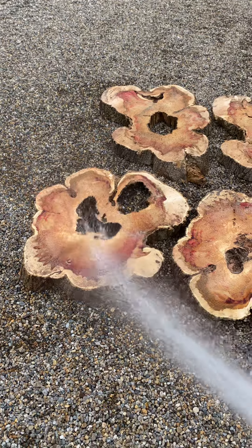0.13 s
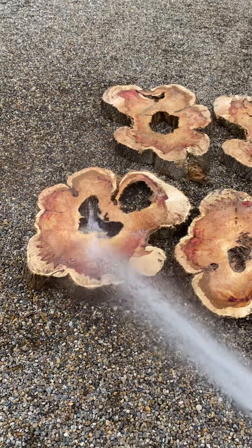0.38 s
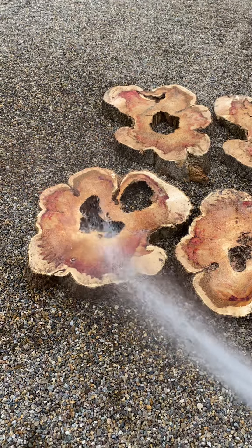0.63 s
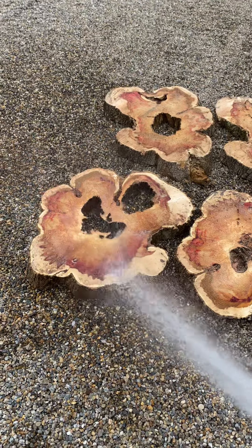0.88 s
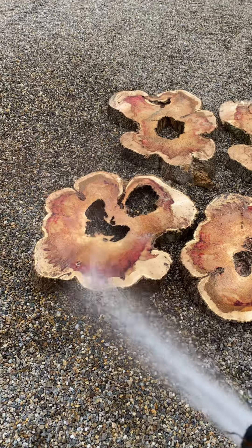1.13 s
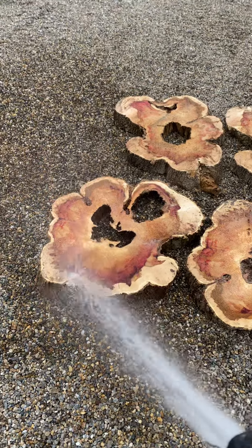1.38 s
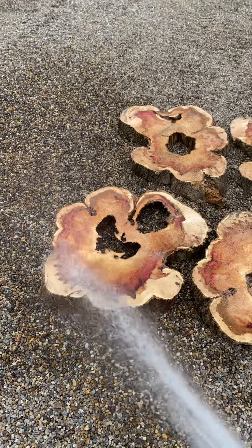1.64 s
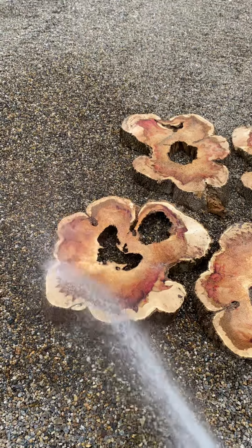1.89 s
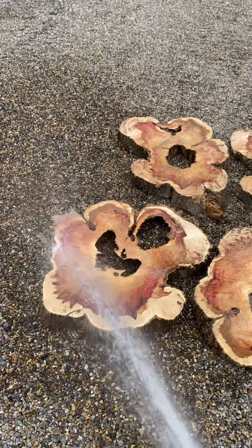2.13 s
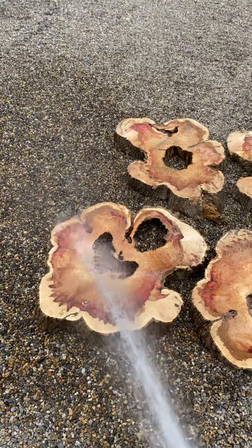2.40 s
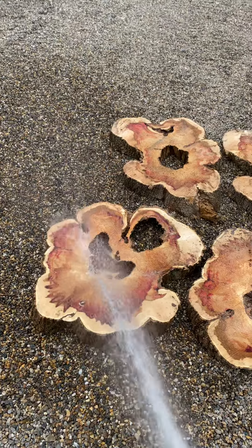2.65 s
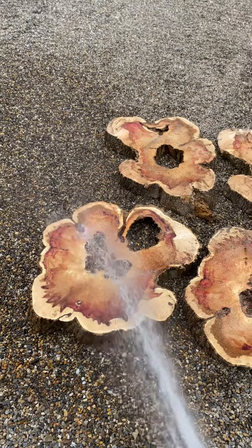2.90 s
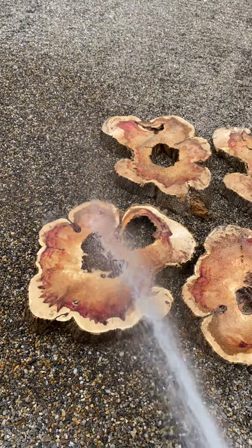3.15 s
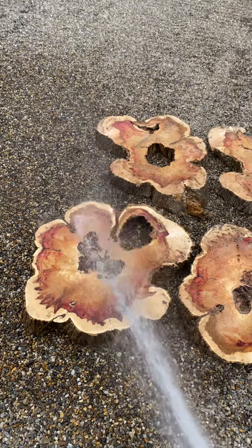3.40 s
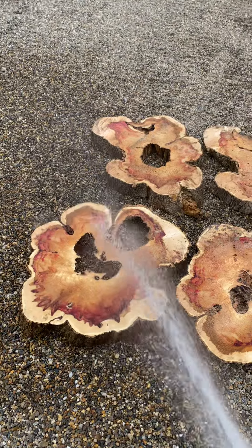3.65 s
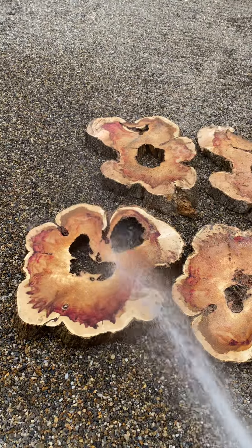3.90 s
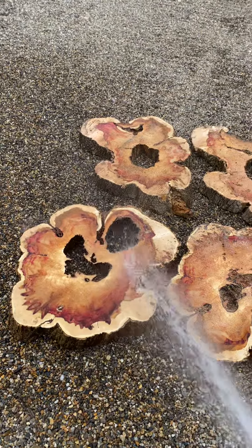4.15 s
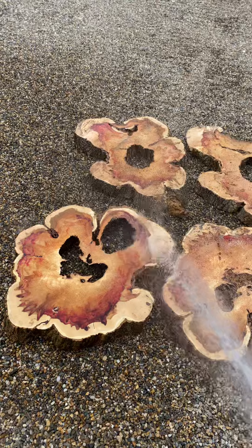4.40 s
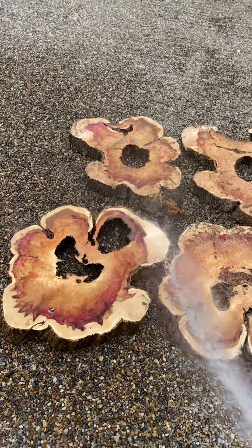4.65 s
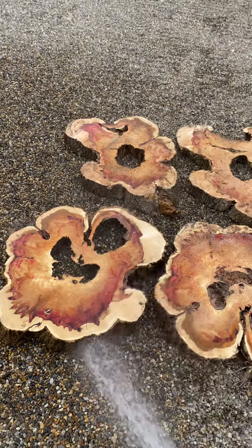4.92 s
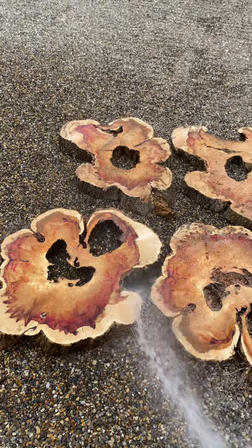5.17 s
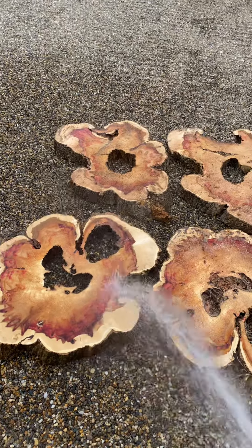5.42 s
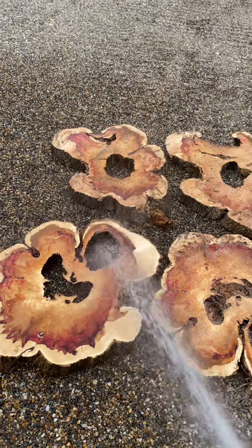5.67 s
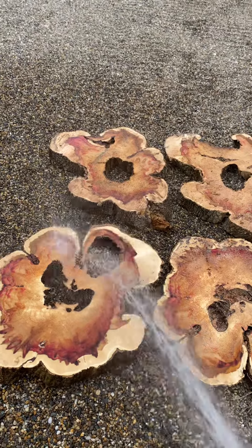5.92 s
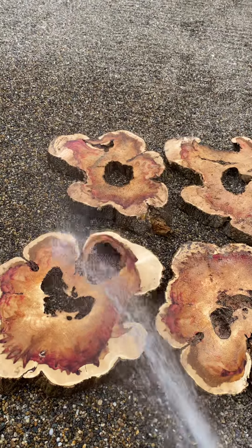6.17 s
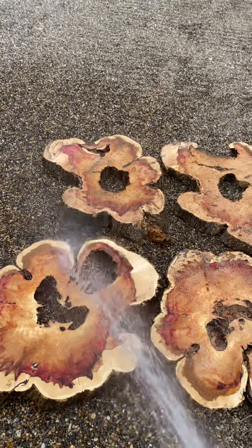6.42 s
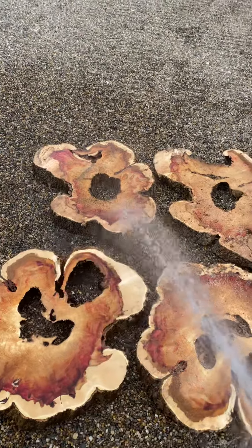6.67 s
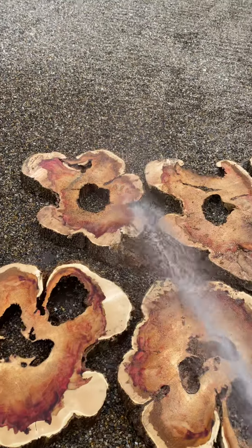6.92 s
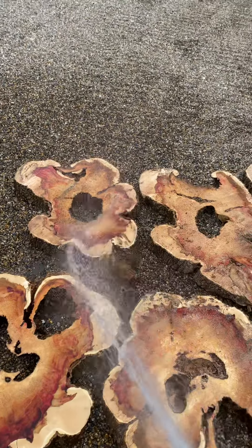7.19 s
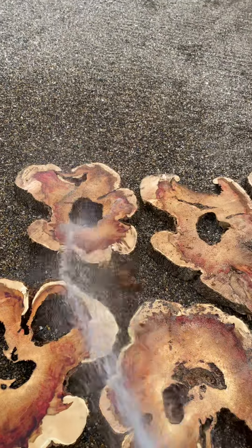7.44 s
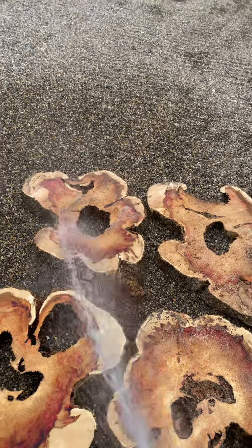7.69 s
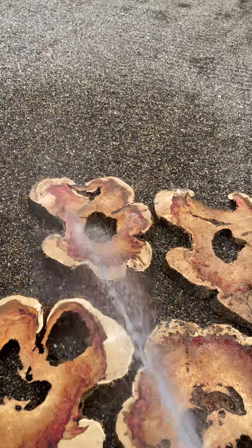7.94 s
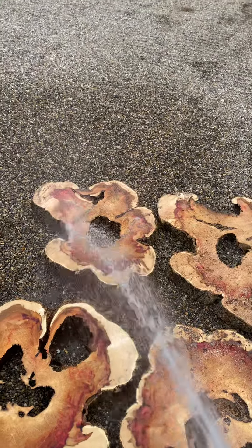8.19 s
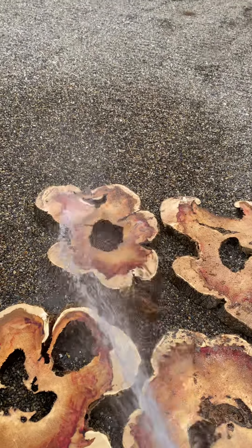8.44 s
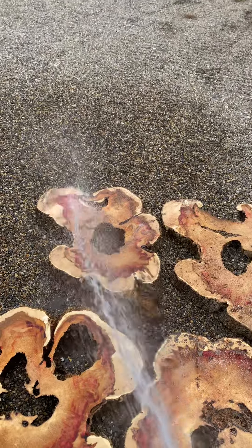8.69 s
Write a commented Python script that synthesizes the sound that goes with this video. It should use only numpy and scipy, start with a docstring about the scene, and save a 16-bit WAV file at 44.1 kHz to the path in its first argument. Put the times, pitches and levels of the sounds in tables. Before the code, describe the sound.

A pressure washer jet sprays wet wooden slabs outdoors for nearly nine seconds, heard close in wide, dry stereo. A bright, grainy, airy hiss with dense spatter runs throughout over faint run-off and a low, unsteady pump hum. It begins at 0 s with an abrupt splash and hollow knock, then a softer woody rush around 0.4-0.6 s and a brief low swell near 0.6. From 1 to 1.9 s it is mostly plain hiss. Between 2 and 3.2 s the jet drums rims and holes in overlapping throaty roars, with more short ones until 3.9. From 4 to 4.9 s it thins to smooth hiss. Quick splashy surges come near 5, 5.3, 5.7 and 6 s, and fuller spatter around 6.4, with a sharp drop tick. Short bursts follow near 7, 7.2, 8.3 and 8.5 s as the hiss becomes slightly lighter, continuing to the end.

```python
"""Outdoors, on pebbled concrete, a pressure washer's fan jet sweeps over wet wooden slabs.
The jet hisses and splashes as patchy noise with random drop impacts, over a steady run-off.
Striking a rim or a hole squarely, it drives the slab's resonances into a roar.
Stray drops tick as bursts of a few cycles and the far pump hums over low rumble.
Two close microphone ports hear it all, each with its own lag and level."""
import sys
import numpy as np
from scipy import signal
from scipy.fft import rfft, irfft, next_fast_len
from scipy.io import wavfile
from scipy.ndimage import uniform_filter1d, map_coordinates

SR = 44100
rng = np.random.default_rng(int(sys.argv[2]) if len(sys.argv) > 2 else 0)


def wav_record(signal):
    """Record a signal, one row per channel, as 16-bit PCM in the file named by sys.argv[1]."""
    frames = np.transpose(np.atleast_2d(signal))
    bounded = np.clip(frames, -1, 1)
    # unit amplitude maps onto the largest positive 16-bit level
    quanta = np.round(bounded * 32767).astype(np.int16)
    wavfile.write(sys.argv[1], SR, quanta)


def voltage_ratio(level):
    """Linear amplitude factor for a level in decibels (scalar or array-like)."""
    return 10 ** (np.asarray(level, float) / 20)


N = 388962  # samples


def spray():
    """The jet's own hiss, the splash off the surface and the steady run-off, all turbulent water."""
    # steady spray: start_s, splash_db, hiss_db
    steady_levels = [(0, -33.5, -25.5), (.29, -33.5, -27.5), (.73, -33.5, -24.5), (1.03, -38.5, -27),
                     (1.42, -37, -26), (1.62, -38.5, -28), (2.7, -35.5, -27.5), (3.41, -38, -28),
                     (3.71, -34.5, -28), (4.45, -39.5, -28), (5.1, -39.5, -28), (6.16, -37.5, -28),
                     (6.36, -33, -27), (6.93, -41, -28), (7.15, -40, -31), (7.45, -36.5, -28.5),
                     (8.3, -37, -30.5), (8.82, -38, -31)]
    # water thrown back as the jet crosses an edge: start_s, length_s, splash_db, hiss_db
    surges = [(0, 0.0092, -28.5, -42), (4.936, 0.06, -35, -30.5), (5.257, .07, -37.5, -27.5),
              (5.683, 0.16, -32, -32.5), (6.038, 0.078, -33, -38), (6.956, 0.061, -36.5, -47),
              (7.214, .09, -37.5, -28.5), (8.34, 0.028, -37, -33), (8.539, 0.029, -32.5, -27.5)]
    # noise colours before level scaling: pitch_hz, level_db
    hiss_colour = [(2000, -60), (3800, -12), (4800, 0), (5500, -2), (6300, 0), (7200, -2), (10000, -1),
                   (12500, -2.5), (13400, -4.5), (15600, -4)]
    splash_colour = [(900, -37), (1700, -3), (2400, 0.5), (4200, 2), (5200, -7.5), (12000, -61)]
    runoff_colour = [(60, -50), (150, -0.5), (300, -5), (1300, -6), (1900, -8), (5000, -52)]

    start, length, *surge_db = np.transpose(surges)
    levels = []
    for steady, db in zip(curves(steady_levels), surge_db):
        surge_power = passes(start, length, db, swell_db=0, rise=161, fall=189)
        levels.append(np.sqrt(steady ** 2 + surge_power))
    splash, hiss = levels

    def brightness(hz, lead, centre, bright):
        return voltage_ratio(bright * np.log2(np.maximum(hz, 100) / 7000))

    def splash_peak(hz, lead, centre, bright):
        return voltage_ratio(3.3 * np.exp(-((hz - centre) / 400) ** 2))

    jet = water(colour(hiss_colour), patchy_db=1.54, flutter_db=.5, drops=1500, drop_db=-4.0)
    jet = moving(jet, brightness)
    spatter = water(colour(splash_colour), patchy_db=1.5, flutter_db=0.58, drops=640, drop_db=-5.0)
    spatter = unit(moving(spatter, splash_peak))
    runoff = water(colour(runoff_colour), patchy_db=2.0, flutter_db=0.54, drops=400, drop_db=-6)
    return hiss * jet + splash * spatter + voltage_ratio(-43.5) * runoff


def slab():
    """Slugs of water drum the wood and the air in its holes; one small spot sounds, so less is scattered."""
    # the jet meets a rim or a hole squarely: start_s, length_s, hollow_db, rim_db, swell_db over the length
    strikes = [(-.02, 0.068, -34, -28.5, -2.5), (.39, 0.23, -41.5, -40, -3),
               (1.963, 0.054, -35.5, -32.5, -2.5), (2.253, .2, -29, -31, -2.5),
               (2.465, 0.13, -34.5, -35.5, -1), (2.63, 0.2, -29, -29.5, 1.5), (2.895, 0.3, -40, -32, 2),
               (3.291, .24, -44, -38, 4.5), (3.6, .22, -44, -42.5, -1), (3.856, 0.082, -35.5, -30, 4),
               (4.768, 0.014, -43.5, -44, -10), (4.968, .02, -45, -36, -6), (5.44, 0.028, -44, -43, -3),
               (5.744, 0.18, -43, -42.5, 1), (6.008, 0.065, -44, -35.5, -2), (6.955, 0.05, -40.5, -37.5, 2),
               (7.987, 0.11, -51, -39, -2), (8.178, 0.022, -53, -42, 6), (8.29, 0.043, -42.5, -39, -4)]
    # resonances of the struck slab, relative levels: pitch_hz, width_hz of each of two passes, level_db
    hollow_modes = [(290, 250, -2.5), (391, 200, -0.5), (557, 345, 8)]
    rim_modes = [(957, 380, 1.5), (1249, 640, 10.5), (2220, 320, -2)]

    start, length, hollow_db, rim_db, swell_db = np.transpose(strikes)

    def roar_level(graze_db, strike_db, lag_s):
        # between strikes the jet only glances off the wood, at a drifting level
        graze = voltage_ratio(graze_db + 2.5 * wobble(3.13))
        struck_power = passes(start + lag_s, length, strike_db, swell_db, rise=350, fall=231)
        return np.sqrt(graze ** 2 + struck_power)

    # the air in the hole speaks a moment after the rim
    hollow = roar_level(-51, hollow_db, lag_s=0.023)
    rim = roar_level(-50.5, rim_db, lag_s=0)
    out = hollow * water(resonant(hollow_modes), patchy_db=2.0, flutter_db=0.85, drops=540, drop_db=-8.5)
    out += rim * water(resonant(rim_modes), patchy_db=1.5, flutter_db=1.85, drops=500, drop_db=-11)
    return out * voltage_ratio([[0], [-4]])  # direct, scattered


def ticks():
    """Each hard drop is a direct burst of a few cycles, swelling and then dying exponentially."""
    # single hard drops: start_s, level_db of the envelope's top, pitch_hz
    hard_drops = [(.681, -14, 6390), (1.312, -12, 6050), (1.437, -15, 6620), (4.978, -17, 2600),
                  (6.3932, -8, 6000), (6.568, -14, 5640), (7.196, -15, 5850), (8.239, -15, 6790)]
    out, t = np.zeros((2, N + 400)), np.arange(400) / SR
    for s, db, hz in hard_drops:
        age = hz * t / .9  # the envelope tops at age 1, after about one cycle
        burst = np.sin(2 * np.pi * hz * t) * age * np.exp(1 - age)
        out[0, round(s * SR):][:len(t)] += voltage_ratio(db) * burst
    return out[:, :N]


def pump():
    """An unsteady firing tone, direct only, over low rumble of filtered noise."""
    # shared level, before the rumble's gain and the tone's wobble: start_s, level_db
    pump_levels = [(0.0, -43.5), (0.56, -34.5), (0.61, -41), (3.39, -43.5), (3.46, -39), (3.54, -45),
                   (3.76, -43), (8.82, -42.5)]
    # noise colour before level scaling: pitch_hz, level_db
    rumble_colour = [(20, -50), (35, -11), (45, -10), (56, 0.5), (110, -4.5), (160, -13.5), (400, -29)]
    level, = curves(pump_levels)
    hz = 56 + 1.52 * wobble(4)
    tone = voltage_ratio(1.5 * wobble(6.6)) * np.sin(2 * np.pi * np.cumsum(hz) / SR)
    rumble = voltage_ratio(2.5) * unit(filtered(rng.standard_normal((2, N)), colour(rumble_colour)))
    return level * (rumble + [[1], [0]] * tone)


def water(response, patchy_db, flutter_db, drops, drop_db):
    """Turbulent noise in patches, fluttering, with drops impacts a second of unequal size; direct and scattered."""
    z = signal.stft(rng.standard_normal((2, N)), nperseg=256)[2]
    # patches: a random field smoothed over frequency, then over time
    field = uniform_filter1d(rng.standard_normal(z.shape[1:]), size=5, axis=0)
    field = uniform_filter1d(field, size=16, axis=1)
    noise = signal.istft(z * voltage_ratio(patchy_db * unit(field)), nperseg=256)[1][:, :N]
    impacts = (rng.random((2, N)) < drops / SR) * rng.laplace(size=(2, N))
    stream = unit(noise) + voltage_ratio(drop_db) * unit(impacts)
    stream = stream * voltage_ratio(flutter_db * wobble(45))
    return unit(filtered(stream, response))


def resonant(modes):
    """Causal sum of resonances, passed twice for steep skirts."""
    def ring(f):
        return sum(voltage_ratio(db / 2) * 1j * f * w / (c * c - f * f + 1j * f * w) for c, w, db in modes)
    return lambda f: ring(f) ** 2


def passes(start, length, level_db, swell_db, rise, fall):
    """Summed power of events that rise, hold with a swell, and fall at steady dB per second."""
    t = np.arange(0, N, 32)[:, None] / SR
    through = np.clip((t - start) / np.maximum(length, .005), 0, 1) - .5
    db = level_db + swell_db * through
    db = db - rise * np.maximum(start - t, 0) - fall * np.maximum(t - start - length, 0)
    return np.interp(np.arange(N) / SR, t[:, 0], (voltage_ratio(db) ** 2).sum(1))


def moving(x, response):
    """x times a response of frequency and of the jet's aim as it moves."""
    # where the jet points: start_s, extra_left_lead_rad near 3150 Hz, splash_centre_hz,
    # brightness of the hiss_db_per_octave
    jet_aim = [(0, 0.94, 2450, 1), (.5, 1.1, 2510, 0.5), (.75, 1.5, 2880, 0.5), (1.8, 2.3, 2980, 1),
               (2.05, 0.28, 2350, 0.5), (4.3, -0.81, 2570, 0), (4.85, -1.2, 3260, 3),
               (5.35, -0.46, 3250, 3), (5.6, -0.36, 4300, -2.5), (6.0, 1.2, 4430, -.5),
               (6.45, 1.2, 4250, 0), (6.75, 0.39, 3600, -1), (7.3, 0.13, 4180, 1.5), (8.82, 0.96, 4060, 3)]
    hz, t, z = signal.stft(x, SR, nperseg=512)
    s, *aim = np.transpose(jet_aim)
    gain = response(hz[:, None], *[np.interp(t, s, c) for c in aim])
    return signal.istft(z * gain, SR, nperseg=512)[1][..., :N]


def ports(pair):
    """A direct and a scattered sound reach the two microphone ports with their own lag and level."""
    # microphone ports: pitch_hz, likeness (0-1), left_lead_rad, left_minus_right_db
    port_table = [(100, .975, 0, 0), (430, .93, -.3, 2.6), (860, .7, -.55, -.9), (1300, .8, -.15, -2.2),
                  (1850, .91, .2, .5), (2500, .62, 1.1, .6), (3050, .55, 1.3, -3), (3700, .52, .9, -.7),
                  (4350, .35, 2.1, -1), (4650, .75, 3.1, -.5), (4900, .62, 4.2, -1.5), (5200, .52, 5.6, -3),
                  (5600, .86, 6.5, -.7), (7200, .7, 7.3, 0), (11000, .8, 9, .4), (12000, .9, 9.4, 0)]
    f, alike, lead_rad, tilt_db = np.transpose(port_table)

    def share(hz, swing, *_):
        # the scattered part enters the ports with opposite signs, making them less alike
        turn = np.arccos(np.interp(hz, f, alike)) / 2
        # around the body's shadow frequency the lag follows the direction of the jet
        lead = np.interp(hz, f, lead_rad) + swing * np.exp(-((hz - 3150) / 380) ** 2)
        left = voltage_ratio(np.interp(hz, f, tilt_db) / 2) * np.exp(.5j * lead)
        direct, scattered = np.cos(turn), np.sin(turn)
        return np.array([[left * direct, left * scattered], [direct / left, -scattered / left]])

    return moving(pair, share).sum(1)


def opposed_treble(x):
    """Above a jumpy edge only the difference of the two channels is left."""
    hz, t, z = signal.stft(x.mean(0), SR, nperseg=1024)
    edge_hz = 11350 + 520 * wobble(18)[np.minimum(t * SR, N - 1).astype(int)]
    edge_hz = np.round(edge_hz / 689) * 689  # the edge jumps in steps
    shared_treble = signal.istft(z * (hz[:, None] > edge_hz), SR, nperseg=1024)[1][:N]
    return x - shared_treble


def unit(x):
    """Scale to rms 1."""
    return x / np.sqrt(np.mean(x ** 2) + 1e-20)


def curves(rows):
    """One gain per sample for each dB column."""
    s, *cols = np.transpose(rows)
    return [voltage_ratio(np.interp(np.arange(N) / SR, s, c)) for c in cols]


def wobble(rate):
    """A smooth random curve, rate knots a second."""
    knots = rng.standard_normal(int(N * rate / SR) + 4)
    return map_coordinates(knots, [np.arange(N) * rate / SR])


def filtered(x, response):
    """x times a complex response of frequency."""
    m = next_fast_len(N + 8192)
    return irfft(rfft(x, m) * response(np.fft.rfftfreq(m, 1 / SR)), m)[..., :N]


def colour(points):
    """Gain from (Hz, dB) points on a log axis."""
    f, db = np.transpose(points)
    return lambda hz: voltage_ratio(np.interp(np.log(hz + 1), np.log(f + 1), db))


def scene():
    """All sources, heard at the two ports."""
    return ports(spray() + slab() + ticks() + pump())


def band_limit(x):
    """A steep low-pass at the top of the band."""
    return signal.sosfilt(signal.butter(12, 15750, fs=SR, output="sos"), x)


def record(dry):
    """Only the opposed part of the top treble stays in the finished mix."""
    mix = opposed_treble(dry)
    return band_limit(mix)


dry = scene()
out = record(dry)
wav_record(out)
```